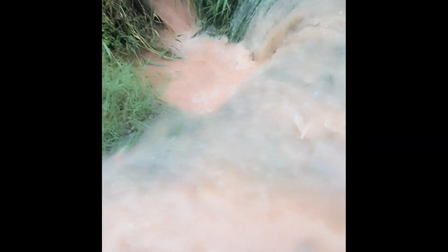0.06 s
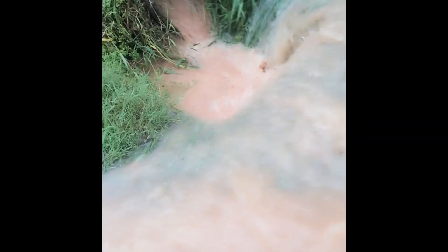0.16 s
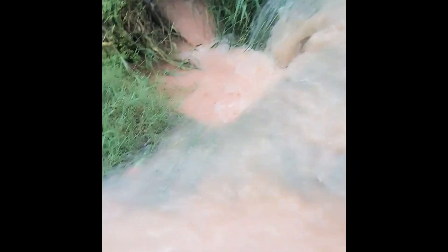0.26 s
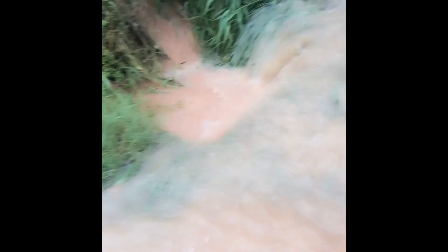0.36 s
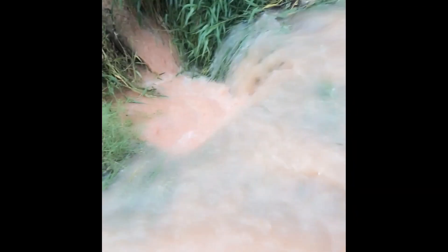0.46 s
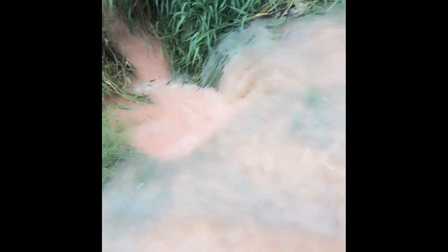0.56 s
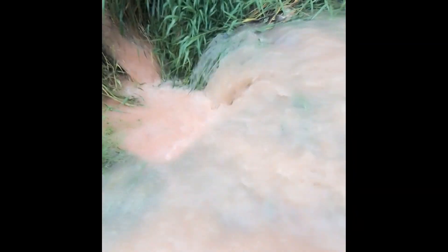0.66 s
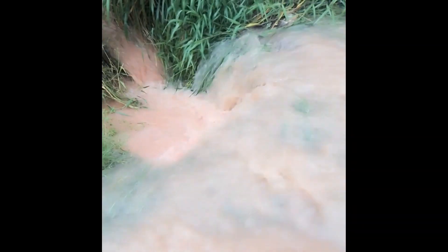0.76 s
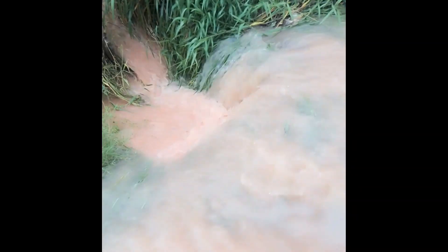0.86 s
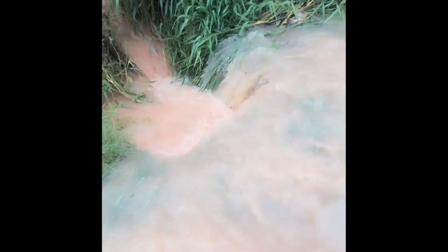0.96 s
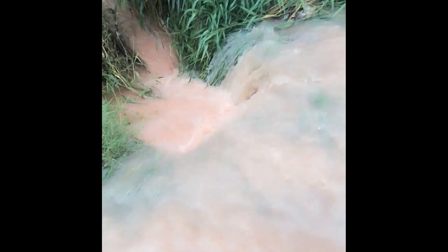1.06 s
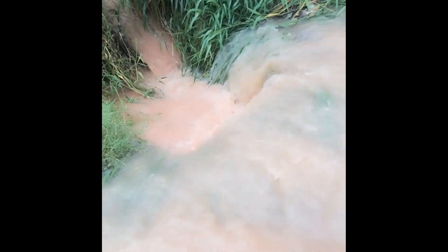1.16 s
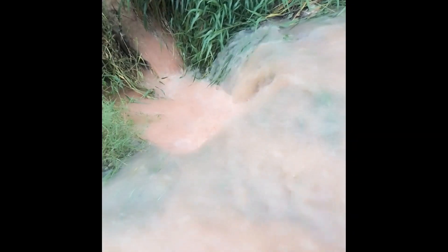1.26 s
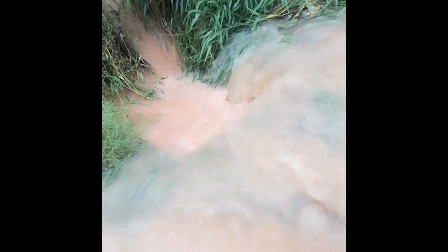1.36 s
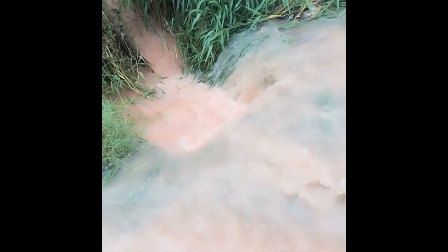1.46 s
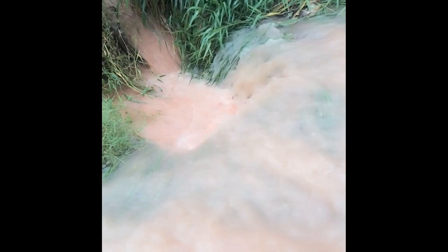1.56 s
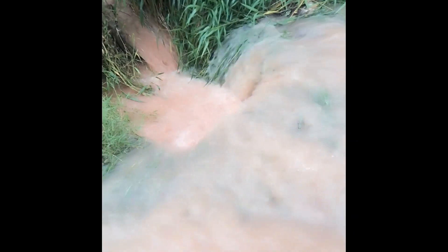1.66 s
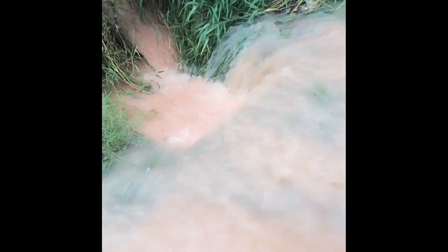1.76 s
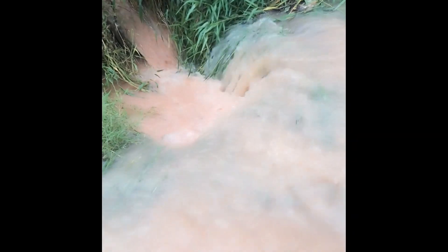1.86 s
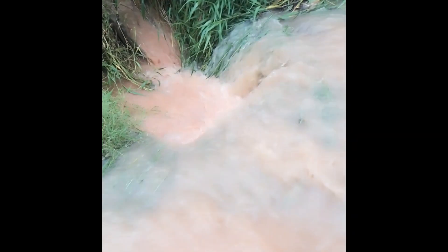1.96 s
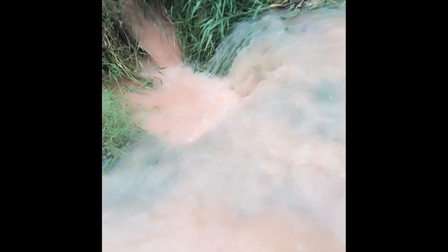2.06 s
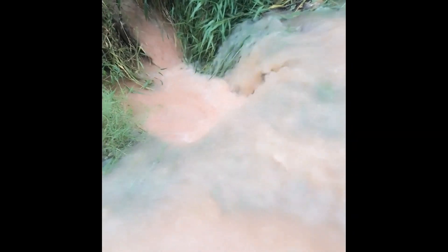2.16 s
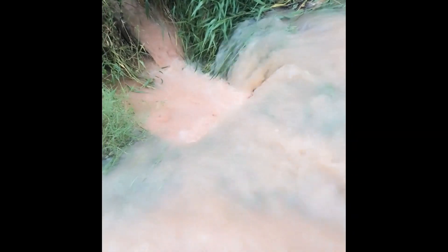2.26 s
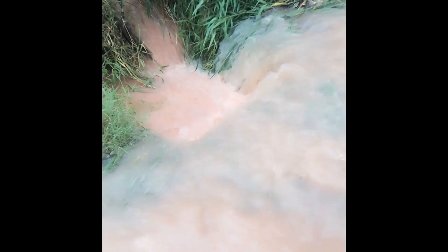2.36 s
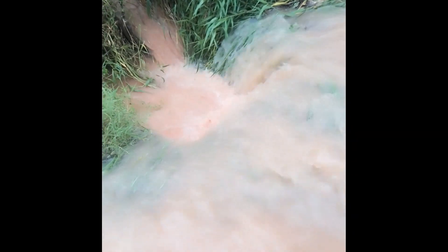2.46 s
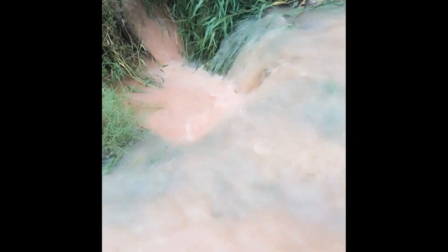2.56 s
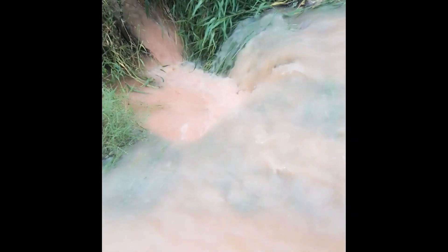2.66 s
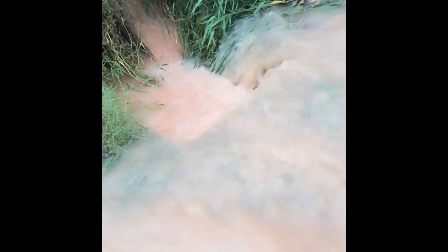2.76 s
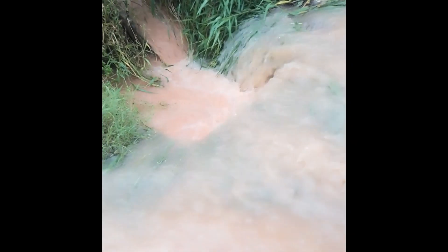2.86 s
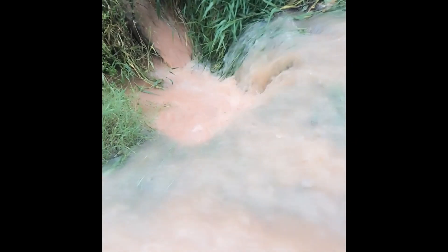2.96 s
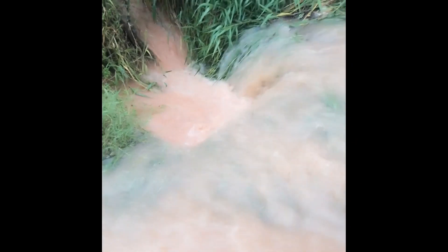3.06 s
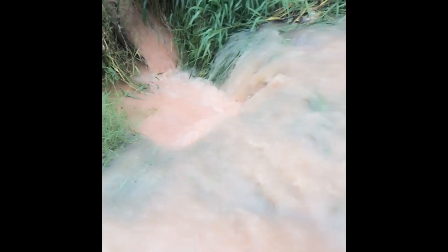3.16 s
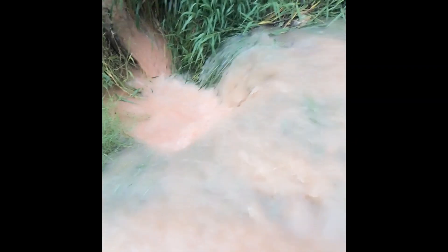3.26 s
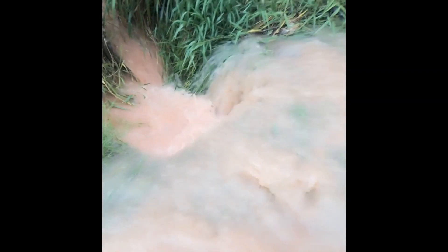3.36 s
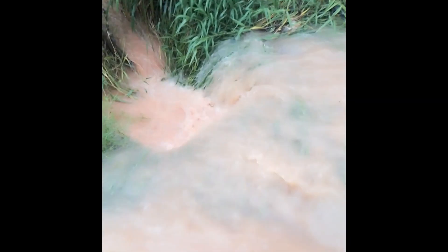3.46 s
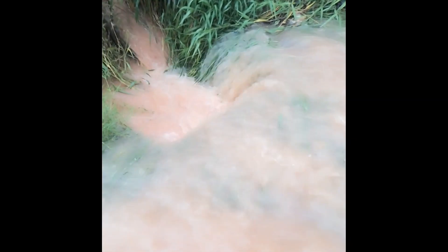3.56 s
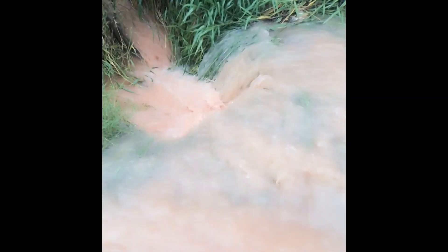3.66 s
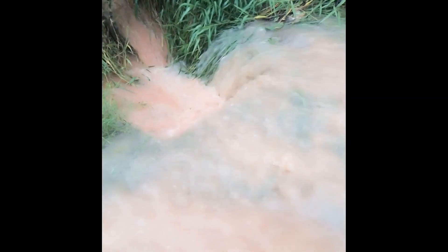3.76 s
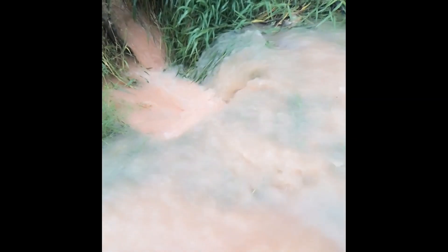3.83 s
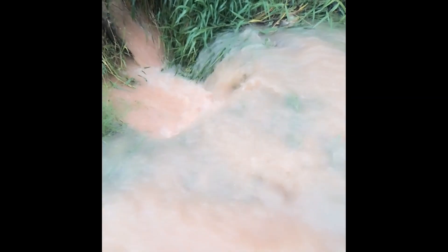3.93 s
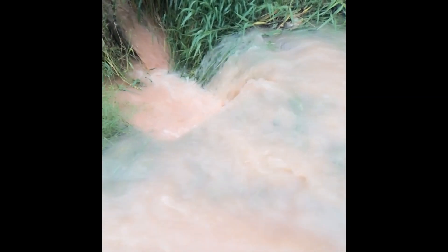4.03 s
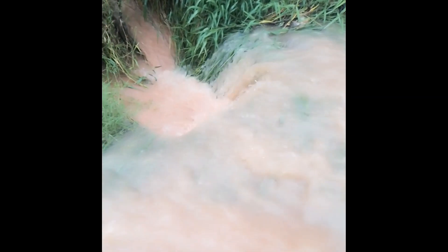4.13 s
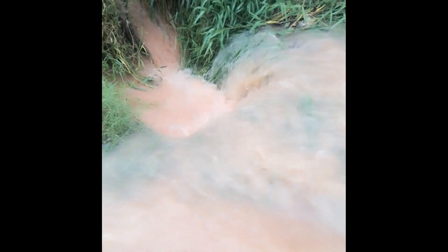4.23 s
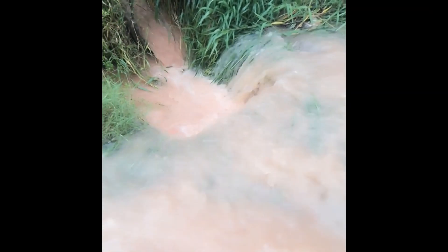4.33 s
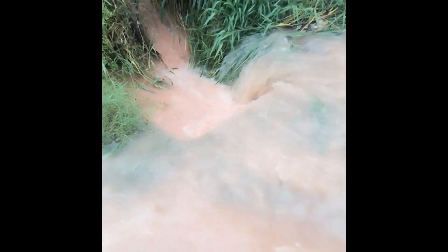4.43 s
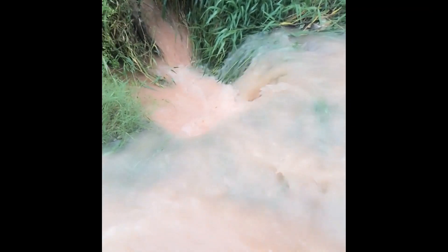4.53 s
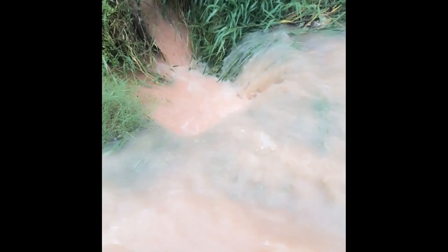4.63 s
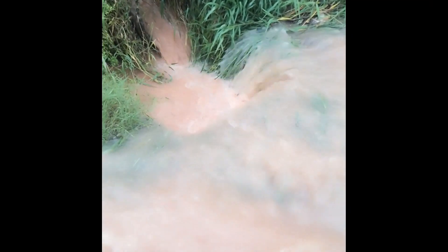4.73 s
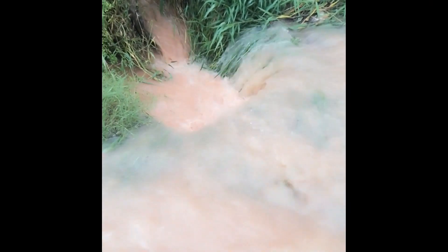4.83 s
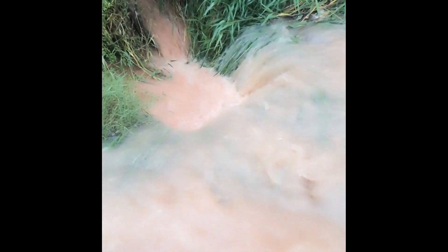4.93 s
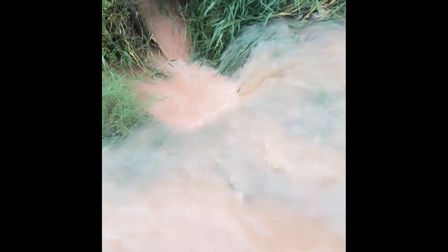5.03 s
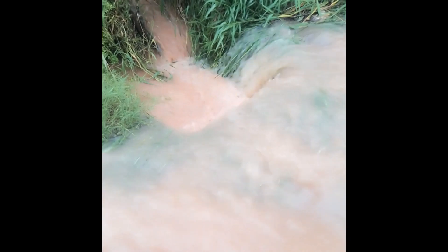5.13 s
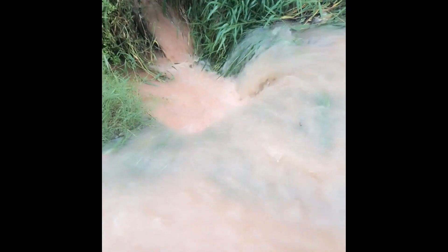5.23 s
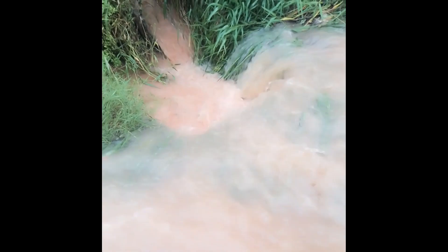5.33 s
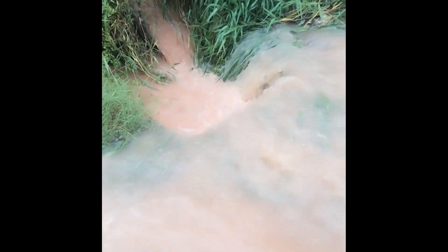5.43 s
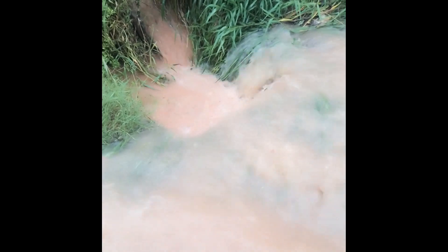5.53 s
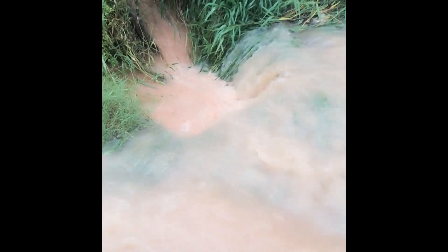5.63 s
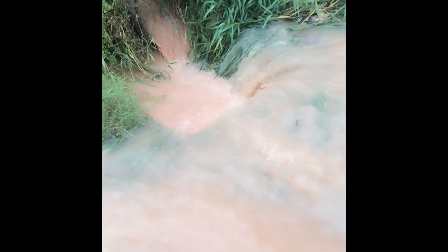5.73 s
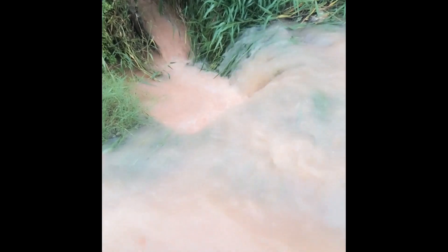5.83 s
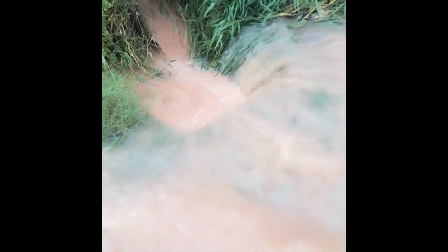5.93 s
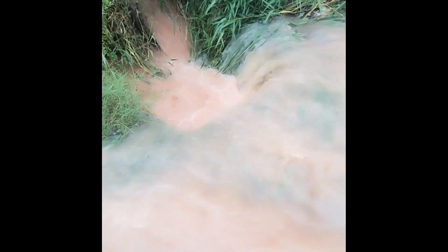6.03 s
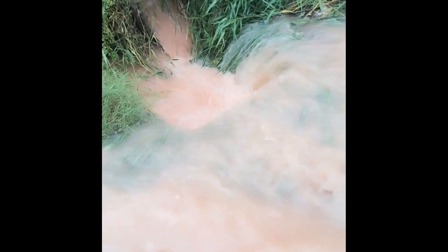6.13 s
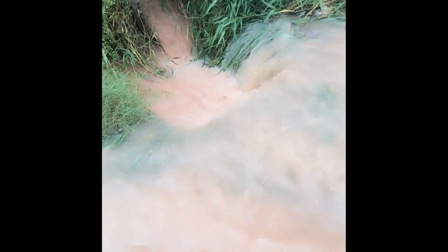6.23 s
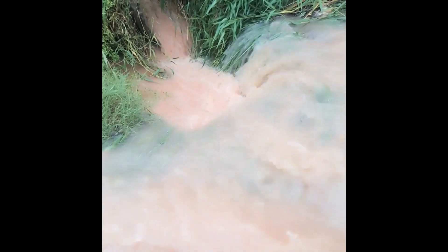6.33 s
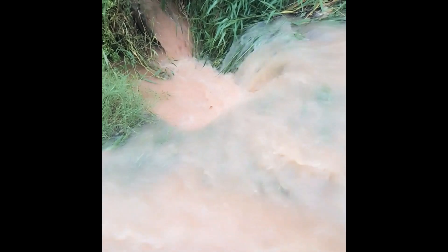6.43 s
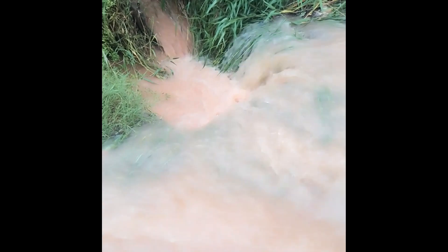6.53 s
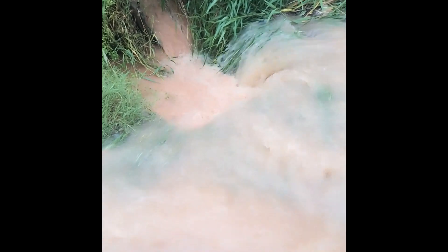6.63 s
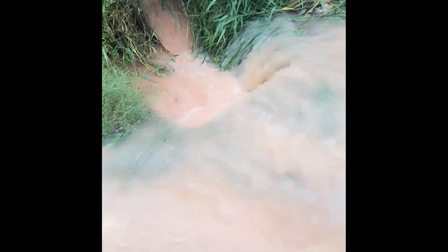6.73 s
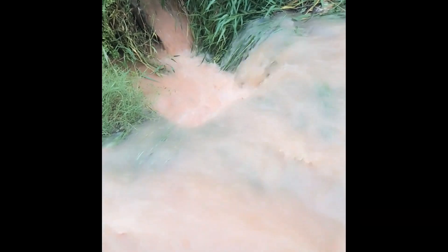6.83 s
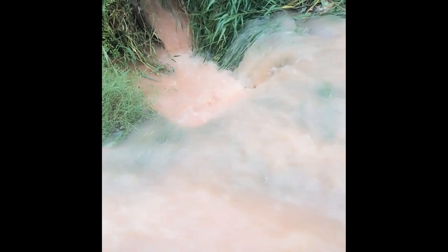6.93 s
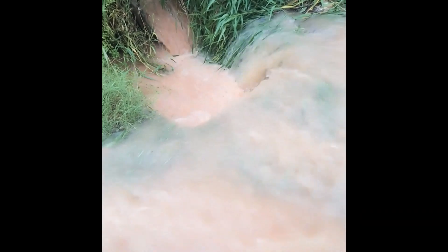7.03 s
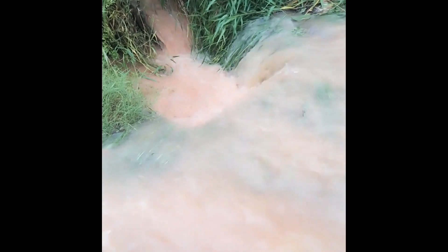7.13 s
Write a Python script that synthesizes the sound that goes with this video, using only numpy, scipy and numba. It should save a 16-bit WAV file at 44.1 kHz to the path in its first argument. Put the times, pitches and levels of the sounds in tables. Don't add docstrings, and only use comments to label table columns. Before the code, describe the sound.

Muddy floodwater rushes steadily down a grassy ditch, a dense hollow mid-range roar with gulping bubbles, small splashes and faint hiss.

```python
import sys
import numpy as np
from scipy import signal
from scipy.fft import rfft, irfft
from scipy.io import wavfile
from scipy.ndimage import uniform_filter1d
from numba import njit

SR = 44100
rng = np.random.default_rng(int(sys.argv[2]) if len(sys.argv) > 2 else 0)


def bounce(signal):
    frames = np.transpose(np.atleast_2d(signal))
    limited = np.clip(frames, -1, 1)
    pcm = np.round(limited * 32767).astype(np.int16)
    wavfile.write(sys.argv[1], SR, pcm)


def convert_level_to_amplitude(level_db):
    exponent = np.asarray(level_db, float) / 20
    return 10 ** exponent


N = 317079
TIME = np.arange(N) / SR
GRID_HZ = np.maximum(np.fft.rfftfreq(N, 1 / SR), 1)
LOW_HZ, JOIN_HZ = 165, 1300


def at_hz(points):
    hz, value = np.transpose(points)
    return np.interp(np.log(GRID_HZ), np.log(hz), value)


def rms_one(x):
    return x / np.sqrt(np.mean(x ** 2))


def drift(rate, count):
    r = np.exp(-2 * np.pi * rate / 1000)
    slow = signal.lfilter([1], [1, -2 * r, r * r], rng.standard_normal((count, 9200)))
    return rms_one(slow[:, 2000:])


def bumps(events):
    return sum(size * np.clip(1 - np.abs(TIME - s) / half, 0, 1) for s, size, half in events)


def coloured(water, spectrum, band):
    return irfft(water * convert_level_to_amplitude(at_hz(spectrum)) * band, N)


def evened(pair, seconds):
    return pair / np.sqrt(uniform_filter1d(np.mean(pair, axis=0) ** 2, size=int(seconds * SR)))


@njit
def ring(start, step, size, cycles, rise, length):
    out = np.zeros(length)
    for k in range(len(start)):
        span = int(cycles * 2 * np.pi / step[k])
        turn = np.exp(1j * step[k] - np.log(1000) / span)
        bend = np.exp(1j * step[k] * rise / span)
        z = size[k] + 0j
        for i in range(start[k], min(start[k] + span, length)):
            out[i] += z.imag
            z *= turn
            turn *= bend
    return out


def churn(surge_db, patch_db, spread_db, cycles, rise, smooth):
    when, pitch, luck, sign = rng.random((4, 180000))
    hz = 30 + 14400 * pitch
    ms = (when * N / SR * 1000).astype(int)
    zone = (4 * np.log2(hz / 30)).astype(int)
    size_db = surge_db[ms] + patch_db[zone, ms] - spread_db * np.log(luck * .998 + .002)
    size = convert_level_to_amplitude(size_db) * np.sqrt(hz) * np.sign(sign - .5)
    swarm = ring((when * N).astype(np.int64), 2 * np.pi * hz / SR, size, cycles, rise, N)
    return rfft(rms_one(swarm) + smooth * rng.standard_normal(N))


# (frequency [Hz], likeness [0-1])
LIKENESS = [(40, .75), (130, .95), (300, .97), (560, .94), (750, .82), (900, .85), (1100, .55), (1300, .25),
            (2100, .66), (2900, .08), (4700, .03), (5300, .15), (8000, 0)]
# (frequency [Hz], lead [radians])
LEAD_OPEN = [(215, 0), (330, .75), (470, .5), (1050, .45), (1400, 1.4), (1750, .7), (2200, 2.1)]
LEAD_COVERED = [(280, 0), (470, 1.2), (650, .85), (860, -.1), (1050, .1), (1300, 2.4), (1750, .6),
                (2200, 2.1)]


def water_at_ports():
    surge_db = 0.55 * drift(6.3, count=1)[0]
    patch_db = 1.93 * drift(12.2, count=36)
    near, left, right = [churn(surge_db, patch_db, spread_db=2.5, cycles=12.5, rise=0.22, smooth=0.76)
                         for _ in range(3)]
    alike = at_hz(LIKENESS)
    shared, own = np.sqrt(alike) * near, np.sqrt(1 - alike)
    left_port = [shared + own * left] * 2
    right_port = [shared * np.exp(1j * at_hz(lead)) + own * right for lead in (LEAD_OPEN, LEAD_COVERED)]
    return left_port, right_port


# (time [s], level [dB])
FLOW = [(.45, -36), (1.25, -35.5), (1.5, -36.5), (2.4, -36), (3.0, -36), (3.35, -36), (3.6, -38),
        (4.6, -38.5), (5.1, -38), (5.7, -38), (6.3, -37.5), (7.19, -38)]
# (time [s], swell [dB], half length [s])
SURGES = [
    (0.79, 5.5, 0.021),
    (1.63, 3, .04),
    (2.1, -3, .03),
    (3.0, 4, 0.025),
    (4.11, -2.5, 0.041),
    (6.19, -3, 0.032),
    (6.6, 2.5, 0.052),
]


def flow_strength():
    return np.interp(TIME, *np.transpose(FLOW)) + bumps(SURGES)


# (time [s], cover lost [0-1], half length [s])
EASES = [
    (5.45, .25, .3),
    (6.25, .35, 0.57),
]


def grip():
    left = np.interp(TIME, (3.3, 3.67), (0.068, 1.014))
    right = np.interp(TIME, (3.25, 3.65), (0.054, 1.03))
    return left - bumps(EASES), right


# (frequency [Hz], level [dB per Hz])
LEFT_OPEN = [(151, -30), (172, -25.5), (290, -3.5), (409, -9), (560, 0.5), (668, -4), (775, -1), (900, -3),
             (990, -9), (1080, -2), (1150, -5.5), (1270, -25.5), (1400, -20)]
LEFT_COVERED = [(151, -37), (172, -27), (237, -7.5), (301, 0.2), (538, -8.5), (668, -7), (797, -13.5),
                (991, -2), (1055, -4), (1292, -32), (1400, -21.8)]
RIGHT_OPEN = [(151, -25.7), (172, -29.5), (237, -12), (301, -7.5), (366, -2), (538, -0.1), (775, -1.5),
              (883, -3.5), (947, -6), (1141, -28), (1400, -15)]
RIGHT_COVERED = [(151, -25.4), (172, -30.5), (237, -10), (280, -5.5), (345, -12), (409, -8.5), (646, 2),
                 (840, -1.4), (1120, -25), (1270, -20), (1400, -24.6)]
# (time [s], change [dB], half length [s])
FINGER = [
    (.5, -2.5, .25),
    (1.0, 3.5, 0.22),
    (3.1, -6.5, 0.19),
    (4.2, 4, 0.19),
    (5.8, -5, .35),
]


def roar(waters, roar_db):
    band = (GRID_HZ >= LOW_HZ) & (GRID_HZ <= JOIN_HZ)
    colours = [(LEFT_OPEN, LEFT_COVERED), (RIGHT_OPEN, RIGHT_COVERED)]
    covers = grip()
    pair = []
    for (water, shaded), cover, (bare, covered) in zip(waters, covers, colours):
        open_sound = coloured(water, bare, band)
        covered_sound = coloured(shaded, covered, band)
        pair.append((1 - cover) * open_sound + cover * covered_sound)
    edge = irfft(rfft(np.array(pair)) * np.exp(-((GRID_HZ - 1100) / 150) ** 4), N)
    wander = drift(7.6, count=1)[0][np.arange(N) * 1000 // SR]
    edge_db = 1.5 * wander + 2 * (covers[0] - .5) + bumps(FINGER)
    return convert_level_to_amplitude(roar_db - 0.18) * evened(pair + (convert_level_to_amplitude(edge_db) - 1) * edge, seconds=.18)


# (frequency [Hz], level [dB per Hz])
LEFT_SPRAY = [(1163, -9.7), (1227, -16.4), (1335, -20.5), (1723, -24.5), (2153, -20), (2627, -33.5),
              (3639, -35), (5125, -31), (7063, -40.5), (9216, -37.5), (12640, -40.5), (13997, -42.5)]
RIGHT_SPRAY = [(1163, -22.6), (1227, -26.5), (1421, -23.5), (2153, -28.5), (2756, -34.5), (3725, -36),
               (4694, -39.5), (5965, -37), (7644, -38.5), (9345, -38.5), (12748, -44.5), (13997, -47)]
# (time [s], gurgle swell [dB], half length [s])
SHEETS = [
    (.58, 3, .05),
    (1.0, 1, .04),
    (1.45, 1.5, .04),
    (2.72, 2, .03),
    (3.5, 2.5, .05),
    (4.09, 4.5, .025),
    (5.05, 3, 0.054),
    (6.51, 3, .03),
    (6.65, 4, 0.022),
    (6.8, 3, .03),
]


def spray(waters, swing_db):
    pair = np.array([coloured(water, fine, GRID_HZ > JOIN_HZ)
                     for (water, _), fine in zip(waters, (LEFT_SPRAY, RIGHT_SPRAY))])
    hiss = irfft(rfft(pair) * (GRID_HZ > 2550), N)
    sheets_db = bumps(SHEETS)
    gurgle_db = -58 + 0.42 * swing_db + sheets_db
    hiss_db = -60.5 + 0.036 * swing_db + 0.5 * grip()[1] + 0.26 * sheets_db
    gurgle = convert_level_to_amplitude(gurgle_db) * evened(pair - hiss, seconds=0.16)
    return gurgle + convert_level_to_amplitude(hiss_db) * evened(hiss, seconds=0.11)


def pops(events, cycles, rise, gain_db, low_hz, high_hz):
    s, peak_db, hz, pan_db = np.transpose(events)
    start, step = (s * SR).astype(np.int64), 2 * np.pi * hz / SR
    both = []
    for side in (1, -1):
        size = convert_level_to_amplitude(peak_db + gain_db + side * pan_db / 2)
        both.append(ring(start + 3 * side, step, size, cycles, rise, N))
    port_range = signal.butter(3, [low_hz, high_hz], "band", fs=SR, output="sos")
    return signal.sosfilt(port_range, np.array(both) + 1e-18)


# (time [s], peak [dB], pitch [Hz], left-right [dB])
GULPS = [(0.538, -23, 493, -2.0), (0.781, -27, 549, -2.5), (0.876, -30, 570, -2), (1.625, -22.5, 526, -1.0),
         (1.991, -22.5, 540, -3), (2.557, -29, 546, -1.5), (2.743, -24.5, 450, -2.0),
         (3.065, -21.5, 610, 0), (3.175, -20, 486, 0), (3.359, -37, 834, -3), (3.685, -26.5, 579, -5.5),
         (5.324, -37, 720, -5.0), (5.635, -26.5, 706, -17), (5.687, -25, 620, -9), (5.741, -36, 626, -8),
         (6.009, -26.5, 756, -7), (6.215, -25.5, 662, -12), (6.264, -20, 740, -3.5),
         (6.416, -24.5, 617, -8)]


def gulps():
    return pops(GULPS, cycles=23.0, rise=0.25, gain_db=-4, low_hz=308, high_hz=1160)


# (time [s], peak [dB], pitch [Hz], left-right [dB])
SPLASHES = [(0.493, -43, 1660, 9), (0.582, -39, 1800, 5), (0.7857, -36, 2120, 4.0),
            (0.9543, -42, 1880, 6.0), (1.4856, -46, 1560, 9), (1.8034, -38, 1440, 2.0),
            (1.9051, -47, 1870, 2.5), (2.0792, -47, 1630, 4), (2.1441, -39, 2080, 6),
            (2.2464, -39, 1890, 7), (2.6225, -46, 2020, 5.0), (2.7228, -41, 2170, 2.5),
            (3.4302, -41, 1890, 5.0), (3.495, -37.5, 2090, 10), (3.5399, -46, 1600, -1),
            (5.0535, -39.5, 1890, 11), (5.4211, -48, 1500, 5.5), (6.0642, -46, 2200, -5),
            (6.1774, -38.5, 2240, 3.0), (6.8978, -48, 1660, 4.5), (6.9911, -47, 2170, 4.5),
            (7.0654, -45, 1530, 4.0)]


def splashes():
    return pops(SPLASHES, cycles=30.0, rise=.2, gain_db=-.5, low_hz=1300, high_hz=2600)


# (time [s], peak [dB], pitch [Hz], left-right [dB])
LONE = [
    (3.362, -32, 1170, 8),
    (5.762, -30.5, 280, 4),
    (3.4, -41, 213, 0),
    (4.85, -44, 1290, -6),
    (6.063, -40, 2200, -1),
    (6.518, -45, 2300, -1),
    (7.8, -41, 2450, 0),
    (6.64, -44, 1830, -2),
]


def lone_bubbles():
    return pops(LONE, cycles=26.0, rise=0.13, gain_db=0.7, low_hz=234, high_hz=2800)


def port_whistle(hz, width_hz, level_db, until_s):
    note = irfft(rfft(rng.standard_normal(N)) / (1 + ((GRID_HZ - hz) / width_hz) ** 2), N)
    fall = np.clip(until_s - TIME, 0, 1) / until_s
    return convert_level_to_amplitude(level_db) * rms_one(note) * fall * [[1], [0.1]]


# (frequency [Hz], level [dB per Hz])
RUMBLE = [(12, -44), (20, -17), (27, -12), (49, -15.5), (113, 2.5), (130, 4), (151, -13), (170, -8),
          (220, -34), (370, -120)]


def rumble(waters):
    pair = np.array([coloured(water, RUMBLE, GRID_HZ < LOW_HZ) for water, _ in waters])
    return convert_level_to_amplitude(-68) * evened(pair, seconds=0.55)


def scene():
    waters = water_at_ports()
    roar_db = flow_strength()
    swing_db = roar_db - np.mean(roar_db)
    flow = roar(waters, roar_db) + spray(waters, swing_db) + rumble(waters)
    whistle = port_whistle(hz=2114, width_hz=54, level_db=-45.0, until_s=0.4)
    return flow + gulps() + splashes() + lone_bubbles() + whistle


# (frequency [Hz], share lost [0-1])
LOST_STRIPS = [(2300, 0), (2700, .11), (3700, .1), (4100, .01), (5500, .005), (7500, .03), (9500, .015),
               (11500, .15), (12500, .06), (14000, .4)]


def patchy_treble(x, depth_db, contrast):
    hz, _, cells = signal.stft(x, SR, nperseg=1024)
    lines, frames = np.indices(cells.shape[1:])
    strip = lines // 3
    luck = rng.random(cells.shape[1:])[strip, (frames + 2 * strip) // 5]
    lost = luck < np.interp(hz, *np.transpose(LOST_STRIPS))[:, None]
    power = np.abs(cells) ** 2 + 1e-20
    around = uniform_filter1d(power, size=15, axis=1)
    sharpen = (power / around) ** (contrast * (hz > JOIN_HZ)[:, None])
    return signal.istft(cells * sharpen * convert_level_to_amplitude(depth_db * lost), SR, nperseg=1024)[1][:, :N]


def band_limit(x):
    return signal.sosfilt(signal.butter(12, 14290, fs=SR, output="sos"), x)


def record(dry):
    fade_start_s, fade_end_s = 0.13, 0.43
    fade = np.clip((TIME - fade_start_s) / (fade_end_s - fade_start_s), 0, 1) ** 1.14
    first_block = convert_level_to_amplitude(-3 * (TIME < .154))
    worn = patchy_treble(dry, depth_db=-30, contrast=.11)
    return band_limit(worn * fade * first_block)


dry = scene()
out = record(dry)
bounce(out)
```